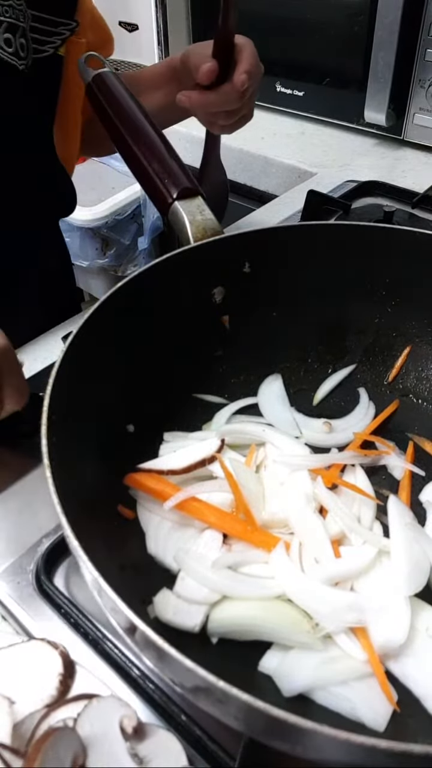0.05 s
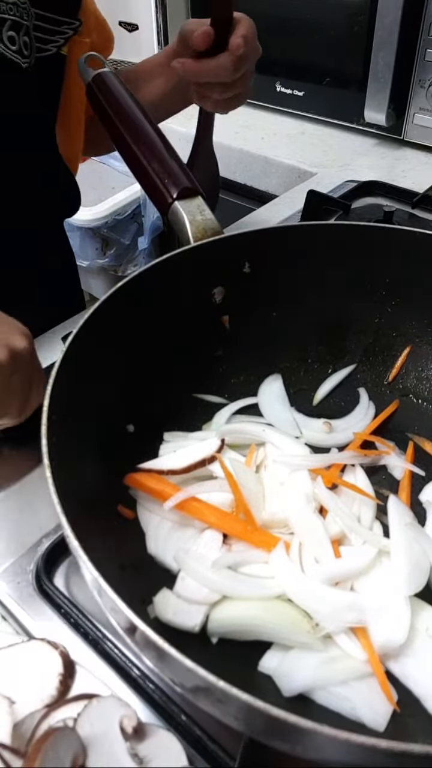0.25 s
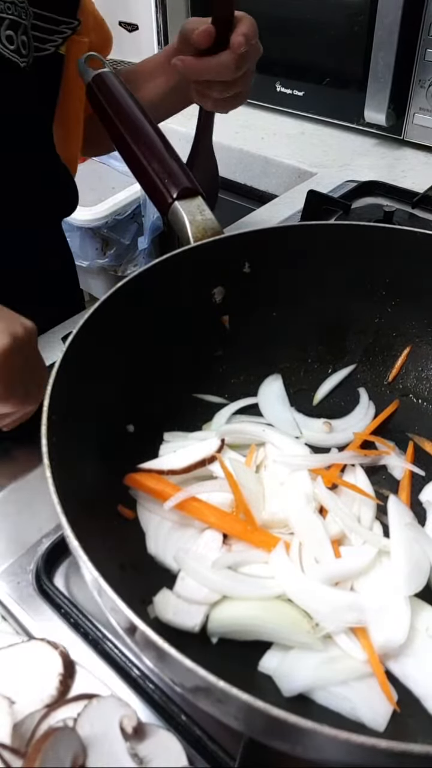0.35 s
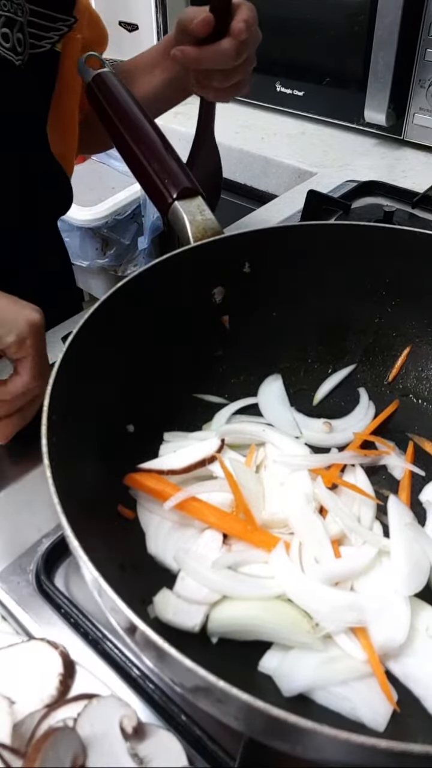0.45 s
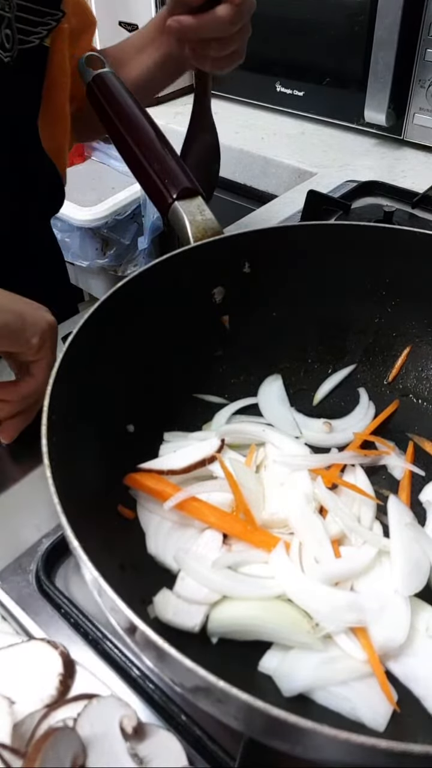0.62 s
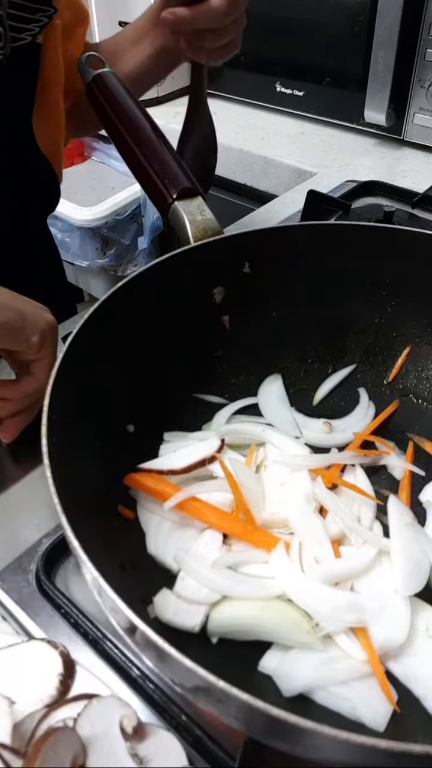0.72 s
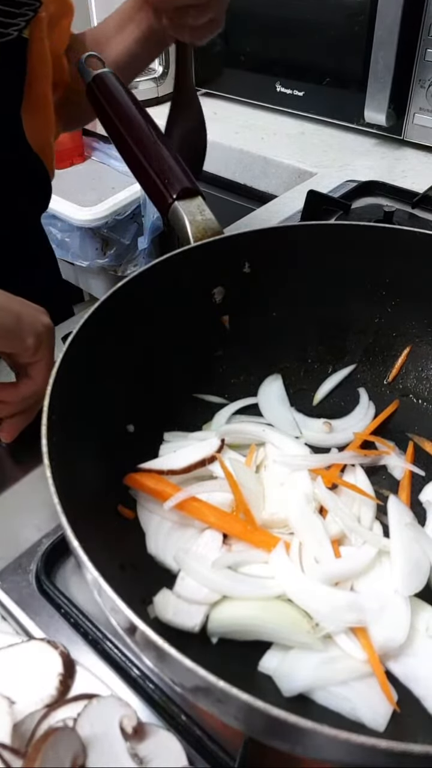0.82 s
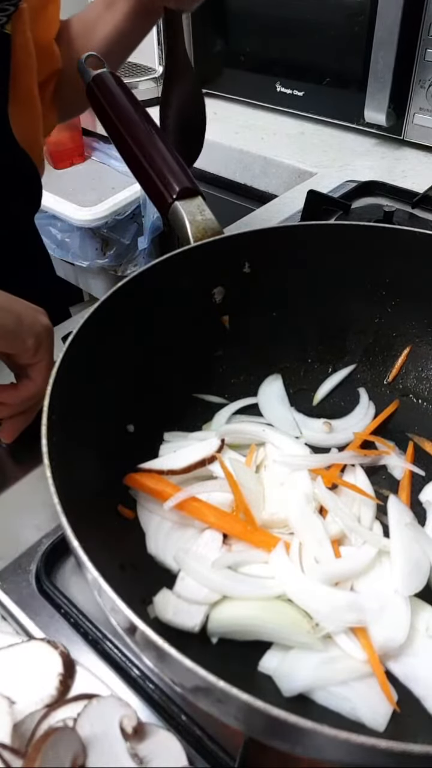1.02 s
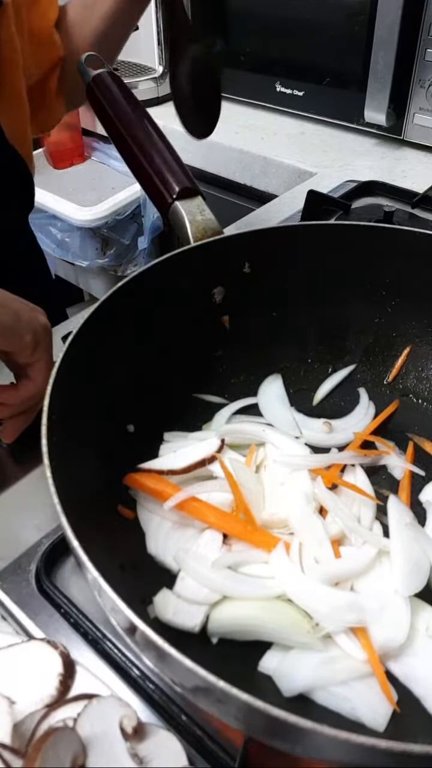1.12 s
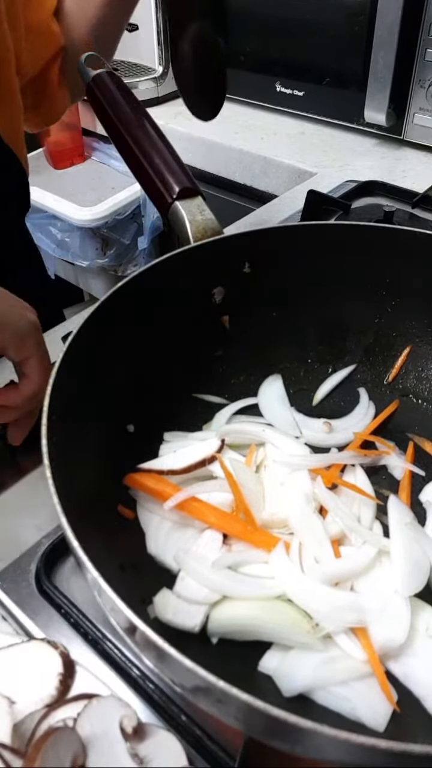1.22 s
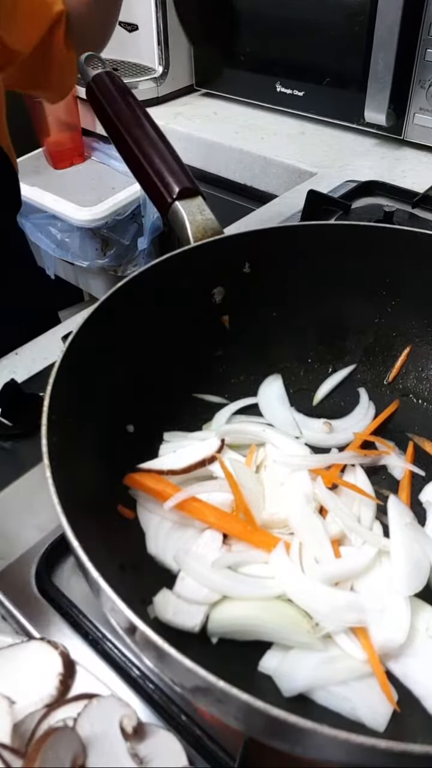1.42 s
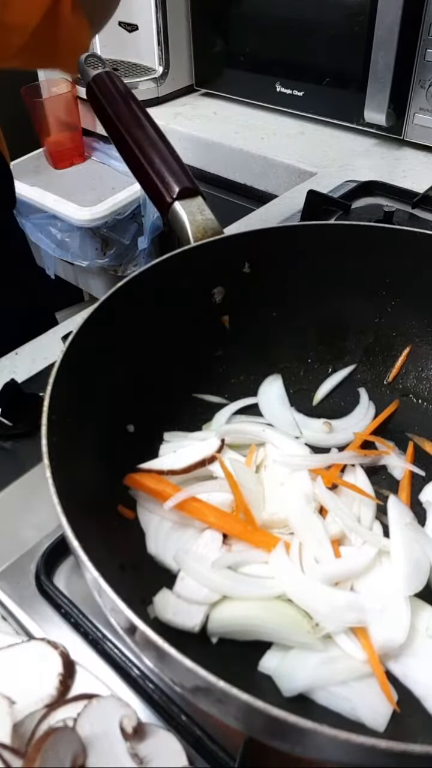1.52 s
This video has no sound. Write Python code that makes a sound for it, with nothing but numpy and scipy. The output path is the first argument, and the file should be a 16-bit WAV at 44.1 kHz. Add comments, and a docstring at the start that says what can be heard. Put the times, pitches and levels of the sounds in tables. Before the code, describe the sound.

Gas hob igniter snaps eight times in quick, even succession, and the burner lights with a soft low whoomp

```python
"""A gas hob is lit under a wok in a small kitchen, over steady hiss and a wavering hum (coloured noise, sine).
Two soft knocks (padded noise bursts) come first, then eight igniter sparks: each a snap of random-sign
clicks, echoes off hob and pan and a room tail, ringing burner and cap. From just before the second spark
unlit gas hisses. The gas catches in two surges of low, fluttering noise with small pops, then burns quietly
as evened noise with low puffs; a third knock follows late."""
import sys
import numpy as np
from scipy import signal
from scipy.fft import rfft, irfft, next_fast_len
from scipy.io import wavfile
from scipy.ndimage import uniform_filter1d

SR = 44100
rng = np.random.default_rng(int(sys.argv[2]) if len(sys.argv) > 2 else 0)


def put_to_file(sound):
    """Save the sound as 16-bit audio at rate SR, in the file named by the first command-line argument."""
    columns = np.atleast_2d(sound).T  # one column per channel
    safe = np.clip(columns, -1, 1)
    whole_steps = np.round(safe * 32767)
    wavfile.write(sys.argv[1], SR, whole_steps.astype(np.int16))


N = 68355
TIME_S = np.arange(N) / SR

# igniter sparks: start_s, level_db, body_db, burner_ring_db, flash_db, cap_ring_db
SPARKS = [(0.2290, 2, -2, -5, 5.5, -2), (0.3630, 3, -5, -4.5, 1.5, -1), (0.4927, 4.5, -2.5, -5.5, 5, -0.5),
          (0.6185, 1.5, -0.5, 2, 1.5, -7), (0.7470, 0.5, -2.5, 0, 3, -5), (0.872, -2, -0.5, 3.5, 0.5, -4),
          (0.9999, -3, 1, 5, 2, -0.5), (1.1272, -1.5, -1.5, -1.5, -1, -23)]
# snap spectrum, lower part: freq_hz, gain_db
SNAP_BODY = [(300, -15), (800, -25), (1250, -5), (1900, -16.5), (2700, -8), (3600, -2), (5700, 2.5),
             (7600, -2.5), (10000, -5), (16000, -16)]
# snap spectrum, upper part: freq_hz, gain_db
SNAP_TOP = [(3000, -52), (7900, -25), (9200, 0.5), (11500, 4.5), (13000, -4.5), (14000, -2), (15400, -5),
            (16300, -12)]
# burner resonances: freq_hz, width_hz, level_db
BURNER_MODES = [(8865, 70, -14), (9450, 300, -9), (9975, 70, -12), (10685, 70, -10), (11350, 350, -4),
                (11790, 260, 1), (12465, 70, -10), (13020, 320, -3), (14300, 60, -16), (15200, 80, -9),
                (15390, 280, -2)]
# burner cap resonances: freq_hz, width_hz, level_db
CAP_MODES = [(3550, 120, -8), (3800, 70, -10), (4750, 170, -4), (5680, 180, 0), (6340, 120, -3)]
BODY_DB, TOP_DB, RING_DB, CAP_DB = -5.5, 1.5, 5.5, -8.5
RAMP_S, RAMP_DB = 0.0018, -5  # short faint noise ramp leading into each snap
FLASH_PEAK_S, FLASH_DECAY_S = 0.00049, 0.0003
ECHO_DB, ECHO_SHARED_POWER = 5.5, 0.22  # share of echo power common to all sparks
RING_ECHO_DB = -5  # near echoes keep the metal ringing
ROOM_DB, ROOM_T60_S, ROOM_BUILD_S = -3, 0.21, 0.0093


def igniter():
    """Each spark is a sharp flash, near echoes and a room tail; its pulse also rings burner and cap."""
    out = np.zeros(N)
    t = TIME_S[:N // 4] - RAMP_S
    age = np.maximum(t, 0)
    shared_echoes = echo_pattern(t)
    pulse = signal.unit_impulse(len(t), int(np.searchsorted(t, 0)))
    ramp_shape = from_db(RAMP_DB) * (1 + t / RAMP_S)
    cluster_shape = np.exp(-np.abs(age - FLASH_PEAK_S) / FLASH_DECAY_S)
    flash_shape = np.where(t < 0, ramp_shape, cluster_shape)
    room_shape = (1 - np.exp(-age / ROOM_BUILD_S)) * from_db(-60 * age / ROOM_T60_S)
    for start_s, level_db, body_db, ring_db, flash_db, cap_db in SPARKS:
        flash = from_db(flash_db) * unit_energy(rng.choice([-1, 1], len(t)) * flash_shape)
        own_echoes = np.sqrt(1 - ECHO_SHARED_POWER) * echo_pattern(t)
        echoes = from_db(ECHO_DB) * (np.sqrt(ECHO_SHARED_POWER) * shared_echoes + own_echoes)
        room = from_db(ROOM_DB) * unit_energy(rng.standard_normal(len(t)) * room_shape)
        snap = flash + echoes + room
        drive = from_db(flash_db) * pulse + from_db(RING_ECHO_DB) * echoes
        body = from_db(BODY_DB + body_db) * unit_energy(colour(snap, SNAP_BODY))
        top = from_db(TOP_DB) * unit_energy(colour(snap, SNAP_TOP))
        burner = from_db(RING_DB + ring_db) * ringing(drive, BURNER_MODES)
        cap = from_db(CAP_DB + cap_db) * ringing(drive, CAP_MODES)
        add(out, start_s - RAMP_S, from_db(level_db) * (body + top + burner + cap))
    return out


ECHOES_PER_S, ECHO_SPREAD_DB = 3200, 2.5
ECHO_BUILD_S, ECHO_T60_S = 0.0024, 0.052


def echo_pattern(t):
    """Separate reflections off hob and pan, building up at once and dying quickly."""
    hits = rng.random(len(t)) < ECHOES_PER_S / SR
    signs = rng.choice([-1, 1], len(t))
    sizes = signs * from_db(ECHO_SPREAD_DB * rng.uniform(-1, 1, len(t)))
    age = np.maximum(t, 0)
    envelope = (1 - np.exp(-age / ECHO_BUILD_S)) * from_db(-60 * age / ECHO_T60_S)
    return unit_energy(hits * sizes * envelope)


MODE_LAG_MAX_S = 0.0011


def ringing(x, modes):
    """A struck part rings in its modes, each with its own slight lag; energy of one."""
    lags = (rng.random(len(modes)) * MODE_LAG_MAX_S * SR).astype(int)
    total = np.zeros(len(x))
    for lag, (freq_hz, width_hz, level_db) in zip(lags, modes):
        delayed = np.pad(x, (lag, 0))[:len(x)]
        total += from_db(level_db) * unit_energy(resonance(delayed, freq_hz, width_hz))
    return unit_energy(total)


# surges of the catching gas: start_s, length_s, level_db
SURGES = [(0.491, 0.13, -31), (0.634, 0.12, -28.5)]
# rush spectrum: freq_hz, gain_db
RUSH = [(25, -50), (42, -46), (65, -3.5), (115, 6.5), (160, -4), (215, -5), (330, -4), (600, -16),
        (1000, -20.5), (1280, -18), (1900, -26), (3500, -24.5), (7500, -40), (16000, -24)]
# pops as the flame jumps from port to port: start_s, level_db
POPS = [(0.543, -16), (0.662, -17), (0.678, -11), (0.698, -13), (0.7365, -13), (0.754, -14)]
# pop spectrum: freq_hz, gain_db
POP = [(60, -4), (300, 14), (700, -8), (1300, -3.5), (2200, -17), (5000, -16), (9000, -39)]
SURGE_ATTACK_S, SURGE_RELEASE_S = 0.032, 0.027
FLUTTER_HZ, FLUTTER_DB = 72, 1.5
POP_DECAY_S = 0.0015


def ignition():
    """The pooled gas burns off in fluttering surges with small pops."""
    swell = np.zeros(N)
    for start_s, length_s, level_db in SURGES:
        attack = np.clip((TIME_S - start_s) / SURGE_ATTACK_S, 0, 1)
        release = np.exp(-np.maximum(TIME_S - start_s - length_s, 0) / SURGE_RELEASE_S)
        swell += from_db(level_db) * attack * release
    flutter = from_db(FLUTTER_DB * drift(FLUTTER_HZ) - 2.5)
    out = swell * even(hollow(noise(RUSH))) * flutter
    t = TIME_S[:N // 32]
    for start_s, level_db in POPS:
        burst = rng.standard_normal(len(t)) * np.exp(-t / POP_DECAY_S)
        add(out, start_s, from_db(level_db) * unit_energy(colour(burst, POP)))
    return out


# settled flame spectrum: freq_hz, gain_db
FLAME = [(25, -30), (45, -15), (75, -8), (115, -1), (190, -3), (350, -2.5), (600, -12.5), (1300, -17.5),
         (2000, -26), (4800, -17.5), (8000, -29.5), (11500, -16), (16000, -21)]
# low puffs of burning gas: centre_s, half_length_s, level_db
PUFFS = [(0.533, 0.041, -42), (0.688, 0.022, -28.5), (0.84, 0.063, -43), (1.056, 0.032, -44),
         (1.151, 0.017, -46), (1.507, 0.018, -43)]
# puff spectrum: freq_hz, gain_db
PUFF = [(30, -35), (55, -5.5), (100, 3.5), (130, 5.5), (190, -14), (300, -22), (1000, -37.5), (4000, -51)]
FLAME_START_S, FLAME_RISE_S, FLAME_DB, FLAME_SETTLE_DB_PER_S = 0.664, 0.034, -44.5, -2


def flame():
    """The lit ring rumbles and hisses softly as it settles, with a few low puffs."""
    age = TIME_S - FLAME_START_S
    level_db = FLAME_DB + FLAME_SETTLE_DB_PER_S * age + 1.3 * drift(22)
    burn = np.clip(age / FLAME_RISE_S, 0, 1) * from_db(level_db)
    puffs = np.zeros(N)
    for centre_s, half_s, puff_db in PUFFS:
        puffs += from_db(puff_db) * np.exp(-((TIME_S - centre_s) / half_s) ** 2)
    return burn * even(hollow(noise(FLAME))) + puffs * even(hollow(noise(PUFF)))


# resonances of the hollow under the wok: freq_hz, width_hz, boost_db
HOLLOW = [(118.8, 10.7, 2.5), (172, 14.3, 7.5), (263, 45, -4), (347, 10, -0.5), (501, 60, -4),
          (723.4, 8.3, 7)]


def hollow(x):
    """Low resonances of the space under the pan; the level is kept."""
    boosted = x + sum(from_db(db) * resonance(x, hz, width) for hz, width, db in HOLLOW)
    return boosted * x.std() / boosted.std()


# unlit gas spectrum: freq_hz, gain_db
GAS = [(200, -39), (800, 1.5), (1400, -1.5), (2300, -8), (4800, 6), (8000, -10), (11000, 5.5), (16000, -5)]
GAS_START_S, GAS_END_S, GAS_FADE_S, GAS_DB = 0.346, 0.697, 0.043, -49.5


def gas():
    """Unlit gas hisses faintly from the ports until it burns."""
    to_edge_s = np.minimum(TIME_S - GAS_START_S, GAS_END_S - TIME_S)
    return from_db(GAS_DB) * np.clip(to_edge_s / GAS_FADE_S, 0, 1) * noise(GAS)


# soft knocks of things being handled: start_s, level_db, base_hz (hump peaks at 1.11 times), decay_s
KNOCKS = [(0.0, -49, 490, 0.04), (0.102, -47.5, 686, 0.058), (1.25, -44.5, 1170, 0.03)]
KNOCK_RISE_S = 0.0052


def knocks():
    """Dull, padded contacts: noise bursts with one broad spectral hump each."""
    out = np.zeros(N)
    for start_s, level_db, hz, decay_s in KNOCKS:
        age = np.maximum(TIME_S - start_s, 0)
        envelope = np.minimum(age / KNOCK_RISE_S, 1) * np.exp(-age / decay_s)
        hump = [(hz / 12, -15), (hz / 3, -1), (hz * 1.11, 0), (hz * 2.0, -17), (hz * 12, -40)]
        out += from_db(level_db) * envelope * noise(hump)
    return out


# room background and hiss spectrum: freq_hz, gain_db
AIR = [(25, -27), (55, -6.5), (110, 3), (175, -4.5), (280, -5), (500, -18.5), (1000, -14), (2000, -24),
       (3200, -17.5), (4800, -11), (6500, -18), (8200, -21.5), (10000, -14.5), (11600, -7), (12800, -10.5),
       (15800, -14.5)]
AIR_DB = -50
HUM_HZ, HUM_DB = 170.1, -60.5  # centre values; both wander


def background():
    """Steady hiss and a low hum wavering in pitch and level."""
    pitch_hz = HUM_HZ + 4 * drift(11)
    tone = np.sqrt(2) * np.sin(2 * np.pi * np.cumsum(pitch_hz) / SR)
    hum = tone * from_db(4.6 * drift(30))
    return from_db(AIR_DB) * noise(AIR) + from_db(HUM_DB) * hum


def from_db(db):
    """Decibels to gain."""
    return 10 ** (np.asarray(db) / 20)


def unit_energy(x):
    """Scale to an energy of one."""
    return x / np.sqrt(np.sum(x ** 2) + 1e-20)


def colour(x, points):
    """Causal (minimum-phase) filter through (freq_hz, gain_db) points, via the folded cepstrum."""
    size = next_fast_len(len(x)) * 2
    hz, db = np.transpose(points)
    grid_hz = np.maximum(np.arange(size // 2 + 1) * SR / size, 1)
    gain = from_db(np.interp(np.log(grid_hz), np.log(hz), db))
    cepstrum = irfft(np.log(gain))
    cepstrum[1:size // 2] *= 2
    cepstrum[size // 2 + 1:] = 0
    return irfft(rfft(x, size) * np.exp(rfft(cepstrum)))[:len(x)]


def noise(points):
    """Coloured noise of rms one."""
    return unit_energy(colour(rng.standard_normal(N), points)) * np.sqrt(N)


def drift(hz):
    """Random movement below a cutoff, of spread one."""
    lowpass = signal.butter(2, hz, fs=SR, output="sos")
    slow = signal.sosfilt(lowpass, rng.standard_normal(2 * N))[N:]  # filter start-up dropped
    return slow / slow.std()


def even(x):
    """Hold a noise at a steady level of one over about 40 ms."""
    return x / np.sqrt(np.maximum(uniform_filter1d(x * x, size=1800), 1e-12))


def resonance(x, hz, width_hz):
    """Two-pole resonance with a peak gain of about one."""
    r = np.exp(-np.pi * width_hz / SR)
    feedforward = np.array([1, 0, -1]) * (1 - r * r) / 2
    feedback = [1, -2 * r * np.cos(2 * np.pi * hz / SR), r * r]
    return signal.lfilter(feedforward, feedback, x + 1e-18)


def add(out, start_s, sound):
    """Mix a sound in at a time."""
    start = max(int(start_s * SR), 0)
    out[start:start + len(sound)] += sound[:N - start]


def scene():
    """Sum of all sources at one microphone above the hob."""
    return (igniter() + ignition() + flame() + gas() + knocks() + background())[None]


LOW_CUT_HZ, HIGH_CUT_HZ = 38, 15800


def record(dry):
    """The microphone sheds the deepest bass; the top is cut steeply."""
    high_pass = signal.butter(4, LOW_CUT_HZ, "high", fs=SR, output="sos")
    low_pass = signal.ellip(8, 0.2, 75, HIGH_CUT_HZ, fs=SR, output="sos")  # ripple_db, stopband_db
    return signal.sosfilt(low_pass, signal.sosfilt(high_pass, dry))


dry = scene()
out = record(dry)
put_to_file(out)
```